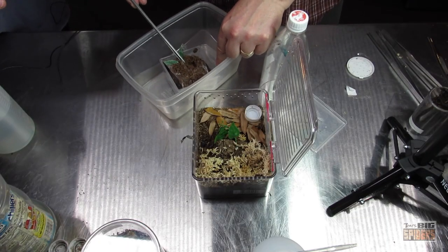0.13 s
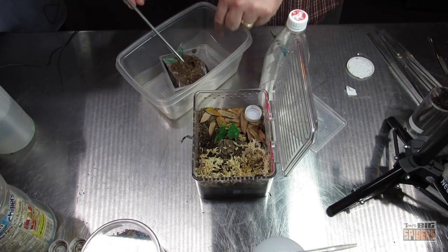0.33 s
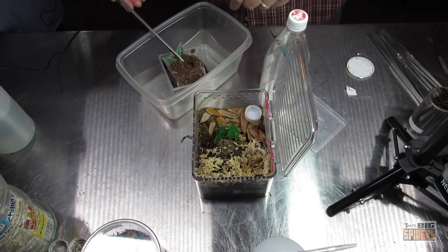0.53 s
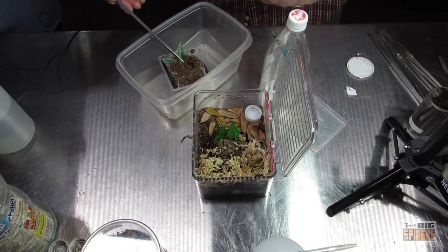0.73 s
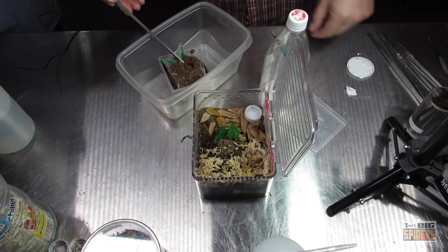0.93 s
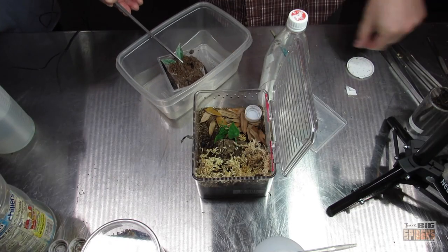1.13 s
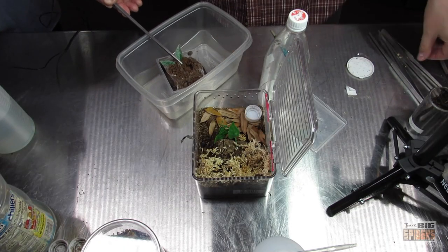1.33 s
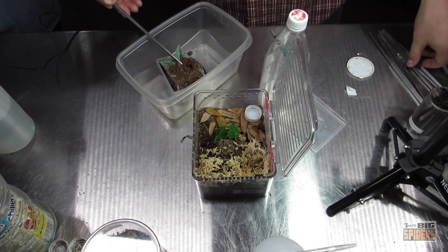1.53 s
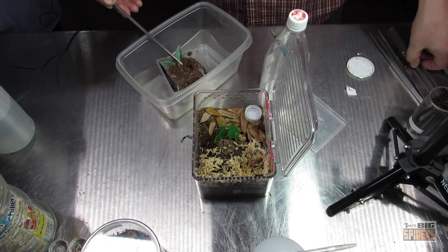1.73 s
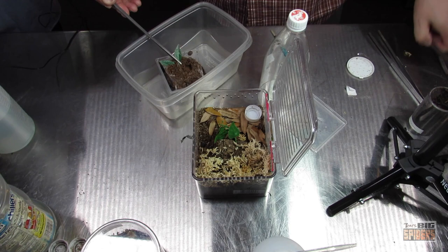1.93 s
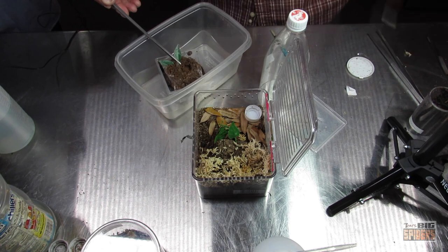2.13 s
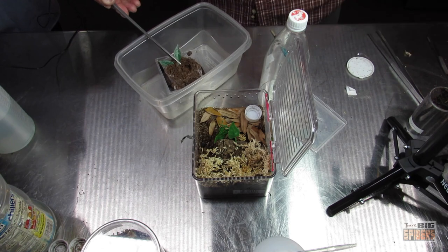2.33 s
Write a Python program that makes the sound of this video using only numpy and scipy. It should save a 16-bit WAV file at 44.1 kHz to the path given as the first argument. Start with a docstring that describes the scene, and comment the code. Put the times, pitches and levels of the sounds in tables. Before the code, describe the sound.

Close up in a quiet small room, cloth rustles, plastic scrapes briefly and a tub is knocked, dull bumps follow, then metal tweezers clatter down in two bright clacks and are dragged and lifted.

```python
"""In a small quiet room, sleeves rustle, plastic drags over a bench and a hand knocks a plastic tub;
soft bumps follow, then long steel tweezers clack twice on a metal table top and are dragged and lifted.
Struck bodies are damped resonators set ringing by impulses, with bursts of dying noise for the clatter.
Rustle is flickering filtered noise, dragging is a train of random grains, and ticks are tiny noise puffs.
A diffuse tail follows all but the rustle and the room tone; the two channels differ by a faint noise."""
import sys
import numpy as np
from scipy import signal
from scipy.fft import rfft, irfft, next_fast_len
from scipy.io import wavfile

SR = 44100
rng = np.random.default_rng(int(sys.argv[2]) if len(sys.argv) > 2 else 0)


def pcm_store(signal):
    """Save signal as 16-bit PCM."""
    levels = np.round(np.clip(np.atleast_2d(signal), -1, 1) * 32767)
    wavfile.write(sys.argv[1], SR, levels.astype(np.int16).T)


def invert_db(x):
    """Field ratio 10**(x/20) for x, a level in decibels (scalar or array-like)."""
    u = np.asarray(x, float) / 20
    return 10 ** u


N = 105840

# Limits of the half-octave bands. Each entry: frequency in Hz.
BAND_LIMITS = 20 * 2 ** np.arange(0, 9.8, .5)
BANDS = list(zip(BAND_LIMITS, BAND_LIMITS[1:]))


def rms_one(x):
    """Normalisation: divide by the root mean square."""
    return x / np.sqrt(np.mean(x ** 2) + 1e-20)


def at_hz(points, hz):
    """Interpolation on a logarithmic frequency axis: read the second column of a table."""
    points = np.array(points)
    return np.interp(np.log(hz), np.log(points[:, 0]), points[:, 1])


def in_time(rows, column, outside_db):
    """Linear interpolation in time: one column of a level curve at every sample."""
    rows = np.array(rows)
    return np.interp(np.arange(N) / SR, rows[:, 0], rows[:, column], outside_db, outside_db)


def band_pass(x, limits):
    """Butterworth band-pass filter between two frequencies in Hz."""
    return signal.sosfilt(signal.butter(2, limits, "band", fs=SR, output="sos"), x)


def drift(rate):
    """Low-passed random fluctuation of rms 1: two equal poles at the rate in Hz."""
    hop = 40  # samples between the slow values
    pole = np.exp(-2 * np.pi * rate * hop / SR)
    white = rng.standard_normal(N // hop + 2002)
    slow = signal.lfilter([1], [1, -2 * pole, pole * pole], white)[2000:]  # settled part
    return np.interp(np.arange(N) / hop, np.arange(len(slow)), rms_one(slow))


def ring(clicks, hz, t60):
    """Damped resonator: a unit impulse starts a sine of height 1 that falls 60 dB in t60 seconds."""
    radius = invert_db(-60 / (t60 * SR))
    angle = 2 * np.pi * hz / SR
    poles = [1, -2 * radius * np.cos(angle), radius * radius]
    return signal.lfilter([0, np.sin(angle)], poles, clicks + 1e-18)


def ring_modes(clicks, modes):
    """Modal superposition: one excitation drives every damped mode (Hz, dB, t60 in seconds)."""
    return sum(invert_db(mode_db) * ring(clicks, hz, t60) for hz, mode_db, t60 in modes)


def colour(x, spectrum):
    """Minimum-phase filtering: a folded cepstrum gives the tabled spectrum without early sound."""
    size = next_fast_len(N + 8192)
    hz = np.maximum(np.fft.rfftfreq(size, 1 / SR), 1)
    cepstrum = irfft(np.log(invert_db(at_hz(spectrum, hz))), size)
    cepstrum[1:size // 2] *= 2
    cepstrum[size // 2 + 1:] = 0
    response = np.exp(rfft(cepstrum))
    return irfft(rfft(x, size) * response, size)[:N]


def noise(spectrum, patchy_db, rate):
    """Modulated noise: half-octave bands flicker together and apart; coloured, rms 1."""
    white = rng.standard_normal((2, N))
    together = drift(rate / 2)
    out = 0
    for k, limits in enumerate(BANDS):
        flicker = invert_db(patchy_db * (together + drift(rate)))
        out = out + flicker * band_pass(white[k % 2], limits)  # neighbours use different noise
    return rms_one(colour(out, spectrum))


def click(s, db):
    """Unit-sample impulse at s seconds, scaled by a level in dB."""
    x = np.zeros(N)
    x[int(s * SR)] = invert_db(db)
    return x


def after(s, t60):
    """Exponential decay: an envelope that starts at s and falls 60 dB in t60 seconds."""
    t = np.arange(N) / SR - s
    return (t >= 0) * invert_db(-60 * np.maximum(t, 0) / t60)


def noise_after(envelope, spectrum):
    """Gated noise, then coloured; its level is set by the same noise ungated."""
    white = rng.standard_normal(N)
    return colour(white * envelope, spectrum) / colour(white, spectrum).std()


def rustle():
    """Friction noise of sleeve cloth: mids and treble swell and flicker separately."""
    # Rustle of the sleeves. Each row: time in seconds, level of the mids in dB, level of the treble in dB.
    levels = [(0, -49.5, -68), (.035, -50, -62.5), (.08, -61, -73.5), (.3, -54, -71), (.47, -64.5, -72),
              (.66, -63, -74), (.8, -55.5, -65.5), (.9, -61.5, -74), (1.15, -60, -71.5),
              (1.3, -62.5, -74.5), (1.42, -61, -78.5), (1.53, -100, -81), (1.64, -61.5, -91),
              (1.9, -55.5, -61.5), (2.2, -54.5, -66.5), (2.4, -57.5, -67.5)]
    # Spectra of the mids and the treble. Each row: frequency in Hz, relative level in dB.
    mid_spectrum = [(100, -37.5), (250, 4), (1000, -1), (2000, -18), (4000, -42)]
    top_spectrum = [(1500, -5.5), (3000, -12.5), (7000, -12.5), (10000, -23.5), (16000, -40)]
    mid = invert_db(in_time(levels, 1, -90)) * noise(mid_spectrum, patchy_db=3.0, rate=13.8)
    top = invert_db(in_time(levels, 2, -90)) * noise(top_spectrum, patchy_db=1.3, rate=28)
    return mid + top


def room_tone():
    """Background noise: a low coloured noise of constant mean level whose bands flicker."""
    # Spectrum of the room tone. Each row: frequency in Hz, relative level in dB.
    spectrum = [(15, -20), (35, 0), (100, -7), (150, 0), (250, -12), (600, -21.5), (2000, -55), (6000, -42),
                (15500, -46.5)]
    return invert_db(-58.5) * noise(spectrum, patchy_db=-2.6, rate=12)


def scrapes():
    """Stick-slip as dense uneven random grains in a broad colour; dragged steel adds resonances."""
    # Drags over the bench, first plastic, then steel. Each row: time in seconds, level in dB.
    drags = [
        [(.085, -80), (.097, -51.5), (.111, -37.5), (.123, -51), (.145, -46.5), (.173, -51.5), (.193, -84)],
        [(1.99, -63), (2.017, -51.5), (2.035, -63), (2.051, -49), (2.1, -60.5), (2.221, -77), (2.259, -51),
         (2.285, -53.5), (2.297, -57), (2.323, -93), (2.4, -70)],
    ]
    # Broad colour of both. Each row: frequency in Hz, relative level in dB.
    spectrum = [(59, -13), (100, -7), (411, 1), (917, -13), (1590, -10), (5170, -23), (15500, -52.5)]
    # Resonances of the steel. Each row: frequency in Hz, bandwidth in Hz, relative level in dB.
    steel_peaks = [(2480, 820, -6.5), (4740, 550, -7.5), (6500, 940, -22)]
    grains_per_s, grain_db = 2600, 2
    density = grains_per_s * invert_db(4.0 * drift(60))  # the grain rate itself fluctuates
    starts = rng.random(N) < density / SR
    heights = invert_db(grain_db * np.minimum(rng.exponential(1, N), 4))
    grains = starts * heights * rng.choice([-1, 1], N)
    body = rms_one(colour(grains, spectrum))
    metal = 0
    for hz, width, db in steel_peaks:
        t60 = np.log(1000) / np.pi / width  # a wider resonance dies sooner
        metal = metal + invert_db(db) * rms_one(ring(grains, hz, t60))
    plastic, steel = (invert_db(in_time(rows, 1, -150)) for rows in drags)
    return (invert_db(-0.5) * plastic + invert_db(-4.5) * steel) * body + invert_db(-2.5) * steel * metal


def ticks():
    """Brief contacts as exponentially dying noise puffs, each with its own spectral peak."""
    # Small dry ticks. Each row: start in seconds, level in dB, strongest frequency in Hz, top frequency in Hz.
    tick_rows = [(0.0972, -40, 1790, 5870), (0.1049, -37, 1900, 9000), (.110, -43.5, 2500, 15000),
                 (0.168, -44, 4000, 9650), (0.242, -52, 5120, 9000), (0.294, -52, 6500, 9100),
                 (1.1074, -43, 2430, 5400), (1.1093, -42, 547, 1300), (1.348, -59, 2370, 8200),
                 (1.9695, -41.5, 2580, 14900), (1.9784, -38, 2570, 14700), (2.052, -60, 5900, 12500),
                 (2.10, -53, 9400, 15000), (2.229, -55, 4030, 9900)]
    t60 = 0.009  # s
    out = 0
    for s, db, hz, top_hz in tick_rows:
        spectrum = [(hz / 4, -22), (hz, 0), (top_hz, -8), (1.43 * top_hz, -45)]
        out = out + invert_db(db) * noise_after(after(s, t60), spectrum)
    return out


def tub():
    """Modal impact: a softened impulse rings the tub, and its walls add a short noisy clatter."""
    # Knocks of the hand. Each row: start in seconds, level in dB, clatter relative to it in dB.
    knocks = [(0.215, -16, -15), (0.2219, -26, -10.5), (0.2709, -26, -46)]
    # Modes of the tub. Each row: frequency in Hz, relative level in dB, 60 dB decay time in seconds.
    modes = [(262, -15, 0.08), (362, -13, 0.05), (422, 0, 0.07), (522, -7, 0.05), (780, -14, .04),
             (1070, -14, .03), (1555, -4, .045), (2184, -1, .05), (2455, -2, .045)]
    # Spectrum of the wall clatter. Each row: frequency in Hz, relative level in dB.
    clatter_spectrum = [(300, 7), (800, 2), (2200, 0), (5000, -8.5), (8500, -21), (12000, -64)]
    clatter_t60, soft_hz = 0.056, 840  # s, upper limit of the touch in Hz
    out = 0
    for s, db, clatter_db in knocks:
        touch = band_pass(click(s, db), [300, soft_hz])
        clatter = noise_after(after(s, clatter_t60), clatter_spectrum)
        out = out - ring_modes(touch, modes) + invert_db(db + clatter_db) * clatter
    return out


def pings():
    """Resonance driven by noise: faint breathy pings of the steel, one narrow dying band each."""
    # Pings. Each row: start in seconds, level in dB, frequency in Hz, 60 dB decay time in seconds.
    ping_rows = [(0.324, -55, 4240, 0.083), (1.595, -71, 4030, 0.061), (2.01, -52.5, 2280, 0.13),
                 (2.053, -48, 2810, 0.052), (2.295, -49, 2500, 0.044)]
    out = 0
    for s, db, hz, t60 in ping_rows:
        breath = rms_one(ring(rng.standard_normal(N), hz, 0.013))
        out = out + invert_db(db) * after(s, t60) * breath
    return out


def bumps():
    """Soft impact: two resonators in series give a low push, and a dull noise puff lies on top."""
    # Bumps on the bench. Each row: start in seconds, level in dB, dull puff relative to it in dB.
    bump_rows = [(0.512, -37.5, -9), (0.856, -31, -11.5), (1.1159, -29.5, -15), (1.1451, -33.5, -10.5),
                 (1.158, -43, 3.5), (1.351, -52, 7), (1.985, -38, -9), (2.231, -37, -5)]
    push_hz, push_t60 = 184.7, 0.023  # Hz, s
    dull = [(100, -6), (500, 0), (1300, -10), (8000, -40)]  # Hz, dB
    blows = sum(click(s, db - 31.5) for s, db, _ in bump_rows)
    push = ring(ring(blows, push_hz, push_t60), push_hz, push_t60 / 2)
    puffs = sum(invert_db(db + puff_db) * noise_after(after(s, 0.013), dull) for s, db, puff_db in bump_rows)
    return push + puffs


def clacks():
    """Chattering impact: a burst of contacts rings the modes; the sheet adds a broad dying crash."""
    # Clacks; the first bounces once. Each row: start in seconds, level in dB, chatter length in seconds,
    # tweezers as an index (0 first, 1 second).
    clack_rows = [(1.64, -20.5, 0.0085, 0), (1.695, -37.5, 0.015, 0), (1.8388, -21.5, 0.0081, 1)]
    # Modes of the first and the second tweezers with the table under them. Each row: frequency in Hz,
    # relative level in dB, 60 dB decay time in seconds.
    first_modes = [(208, -6, .1), (360, 0, .1), (625, -8, .025), (830, -6, .025), (960, -4, .03),
                   (1060, 1, .045), (1650, -5, .05), (3575, -6, .09), (4080, -3, .055), (5146, 0, .04)]
    second_modes = [(335, -5, .1), (807, -3, .09), (1460, -2, .025), (1575, -1, .04), (2570, -3, .05),
                    (2750, -2, .05), (3450, -4, .04), (4097, -3, .045), (4530, -3, .045)]
    # Broad crash of the sheet metal. Each row: frequency in Hz, relative level in dB.
    crash_spectrum = [(90, -31), (250, -13), (800, 2), (2000, -4), (6000, -4.5), (12000, -4),
                      (15500, -18.5)]
    contacts_per_s, contact_share = 3800, 0.25  # share: contact height beside the opening click
    ring_db, crash_db = -13, -8.5
    crash_t60, crash_rise = 0.061, 0.003  # s
    t = np.arange(N) / SR
    out = 0
    for s, db, length, which in clack_rows:
        contacts = (rng.random(N) < contacts_per_s / SR) * rng.standard_normal(N)
        chatter = contacts * (t > s) * after(s, 4 * length) * contact_share
        modes = (first_modes, second_modes)[int(round(which))]
        rings = ring_modes(chatter + click(s, 0), modes)
        # the crash rises and holds through the chatter, then dies
        rise = np.clip((t - s) / crash_rise, 0, 1) * (t < s + length)
        hold = np.maximum(after(s + length, crash_t60), rise)
        crash = noise_after(hold, crash_spectrum)
        out = out + invert_db(db + ring_db) * rings + invert_db(db + crash_db) * crash
    return out


def room(x):
    """Diffuse reverberation: convolution with noise that decays at its own rate in each band."""
    # Decay of the room. Each row: frequency in Hz, 60 dB decay time in seconds.
    decay = [(150, 0.34), (500, 0.31), (3700, 0.26), (9700, 0.18), (14000, 0.048)]
    tail_db, delay = -8, 0.0026  # dB of the whole tail, s before it begins
    t = np.arange(SR // 2) / SR
    white = rng.standard_normal((2, SR // 2))
    tail = 0
    for k, limits in enumerate(BANDS):
        tail = tail + band_pass(white[k % 2], limits) * invert_db(-60 * t / at_hz(decay, limits[0]))
    tail = tail * (t > delay)
    tail = tail / np.sqrt(np.sum(tail ** 2))
    return invert_db(tail_db) * signal.fftconvolve(x, tail)[:N]


def scene():
    """Superposition at one microphone; small sources radiate little bass, hence the high-pass."""
    near = scrapes() + ticks() + tub() + pings() - bumps() + clacks()
    near = signal.sosfilt(signal.butter(2, 90, "high", fs=SR, output="sos"), near)  # Hz
    mid = near + room(near) + rustle() + room_tone()
    return np.array([mid, mid])


def band_limit(x):
    """A steep low-pass at the top of the band."""
    return signal.sosfilt(signal.butter(12, 17000, fs=SR, output="sos"), x)


def record(dry):
    """Multiplicative noise in opposite signs parts the two channels; a low-pass cuts the top."""
    # Spectrum of the difference. Each row: frequency in Hz, relative level in dB.
    trace_spectrum = [(300, -38), (1200, -13), (5600, -9), (16000, -16)]
    trace = colour(dry[0] * rng.standard_normal(N), trace_spectrum)
    both = dry + invert_db(-17.5) * trace * [[1], [-1]]
    top_cut = signal.cheby2(12, 30, 16000, fs=SR, output="sos")  # 30 dB down from 16000 Hz
    mix = signal.sosfilt(top_cut, both)
    return band_limit(mix)


dry = scene()
out = record(dry)
pcm_store(out)
```